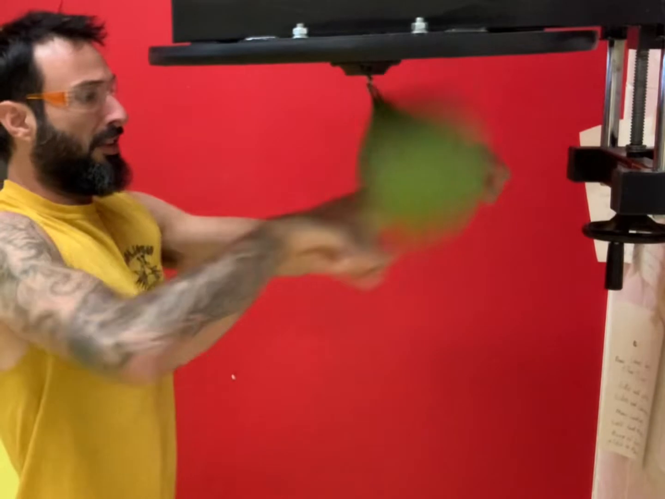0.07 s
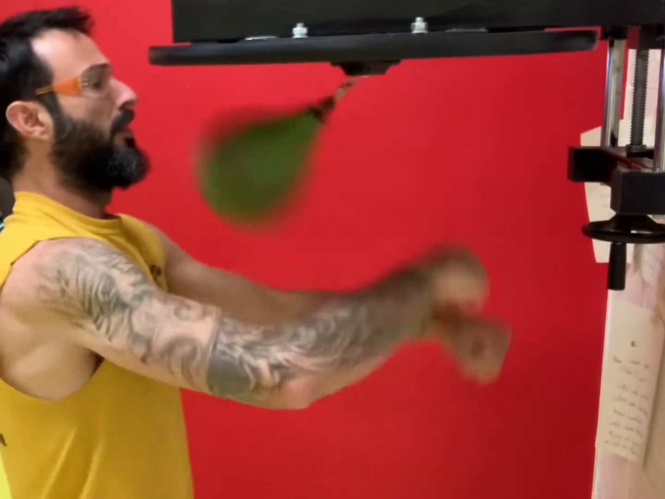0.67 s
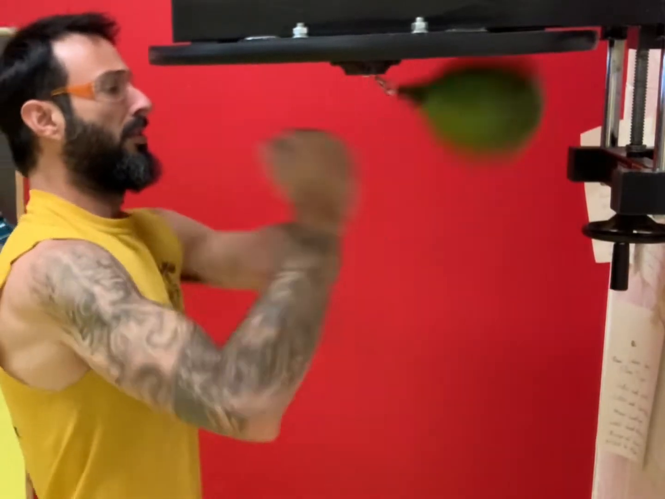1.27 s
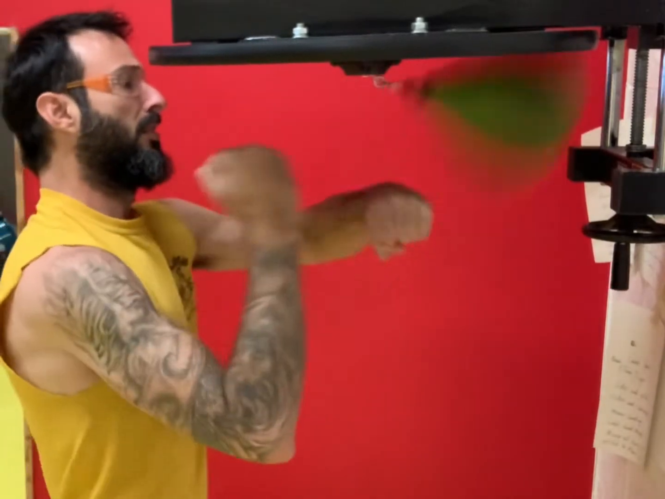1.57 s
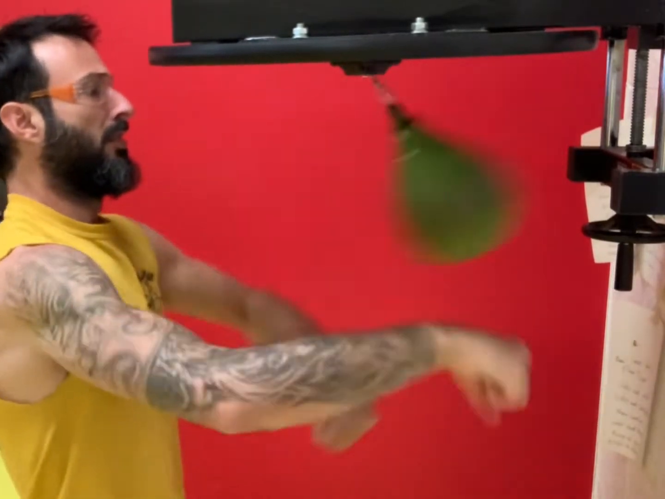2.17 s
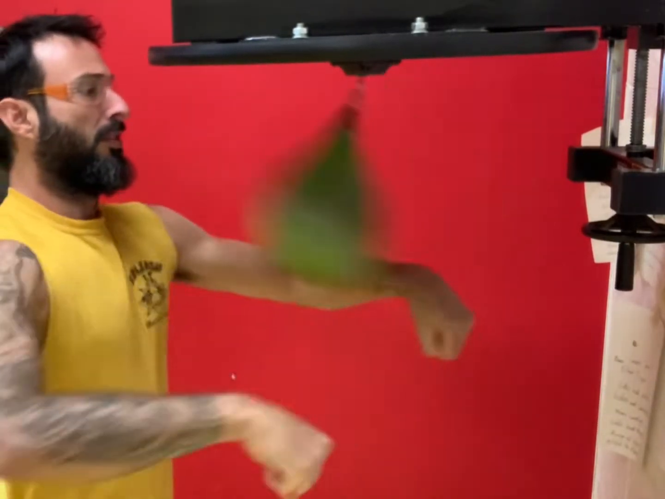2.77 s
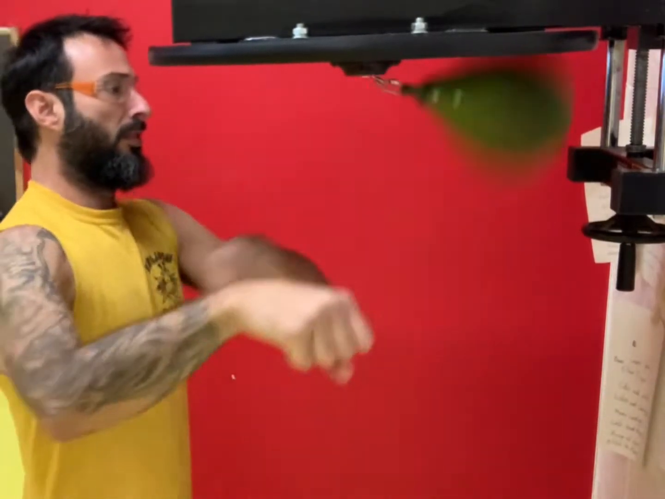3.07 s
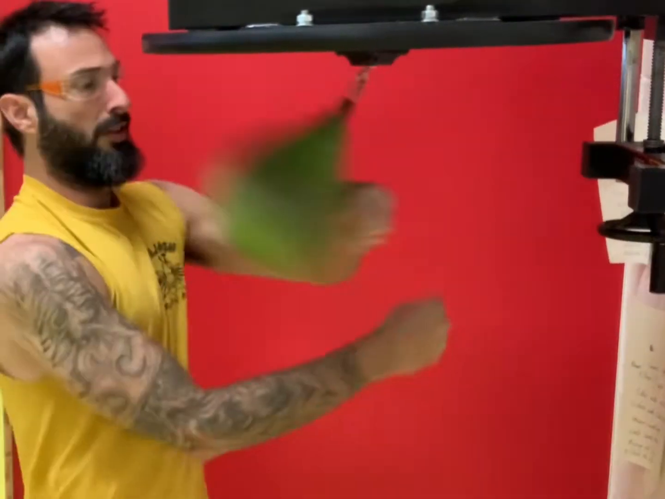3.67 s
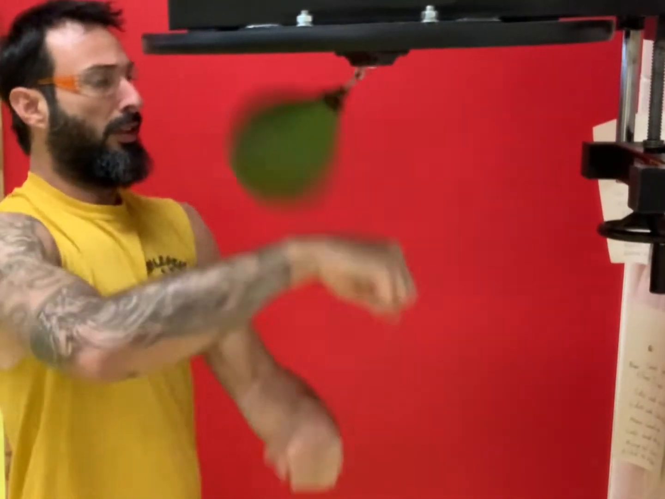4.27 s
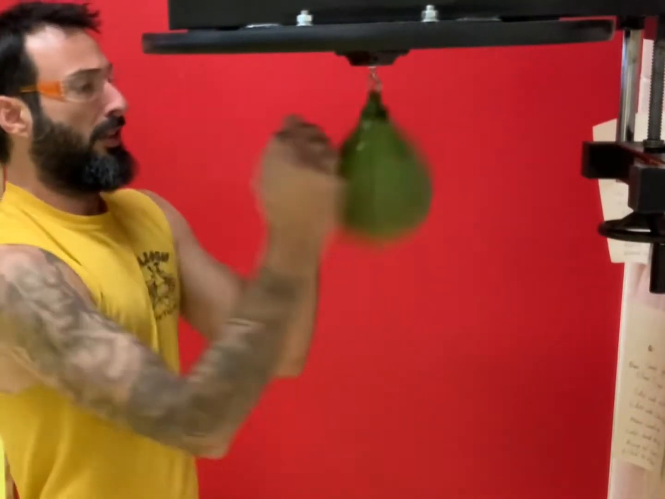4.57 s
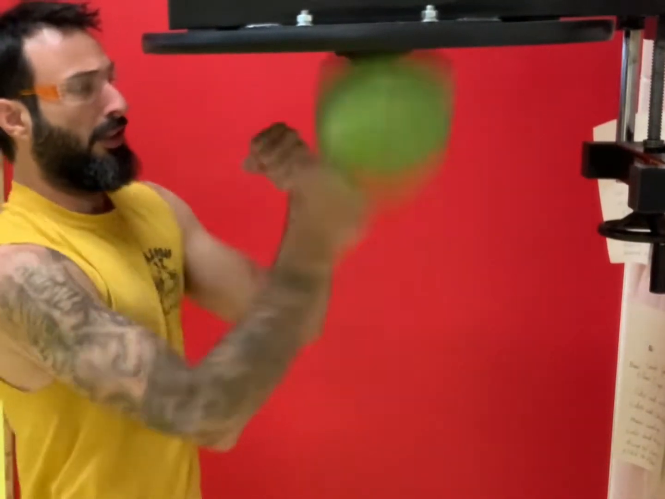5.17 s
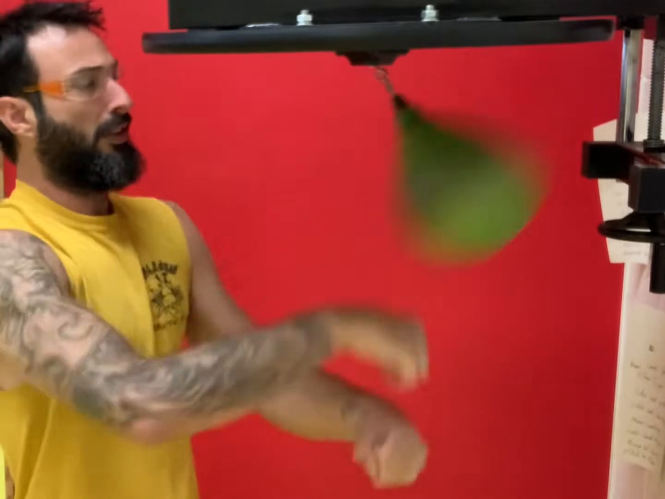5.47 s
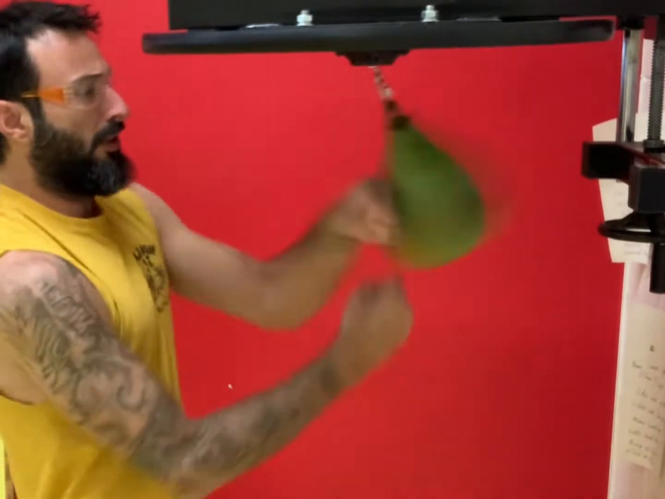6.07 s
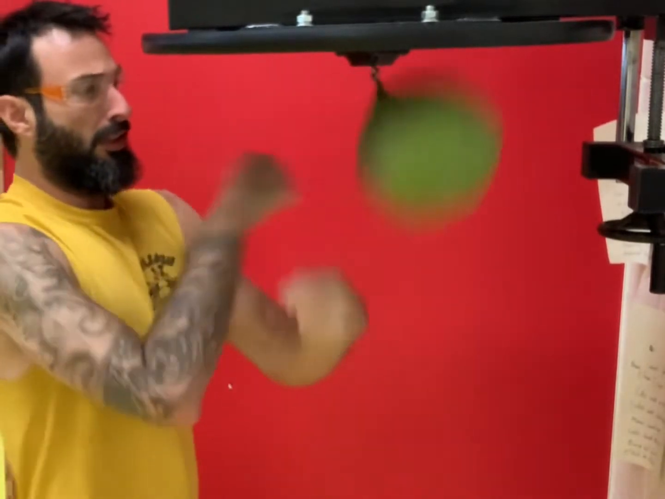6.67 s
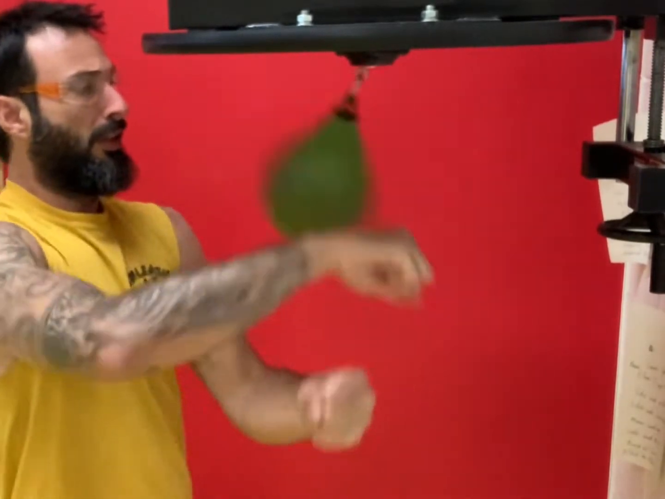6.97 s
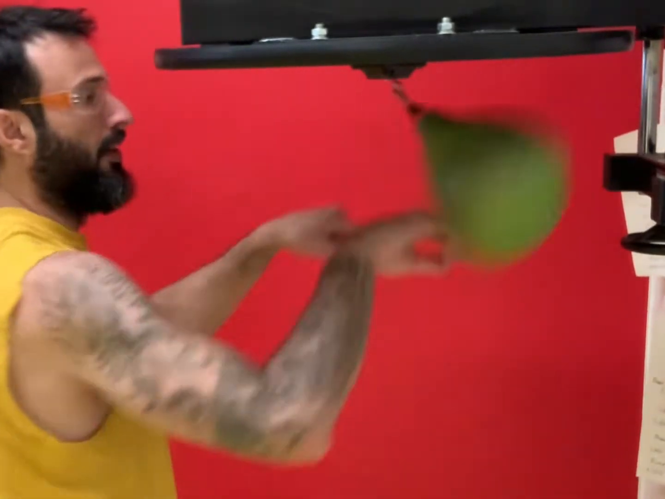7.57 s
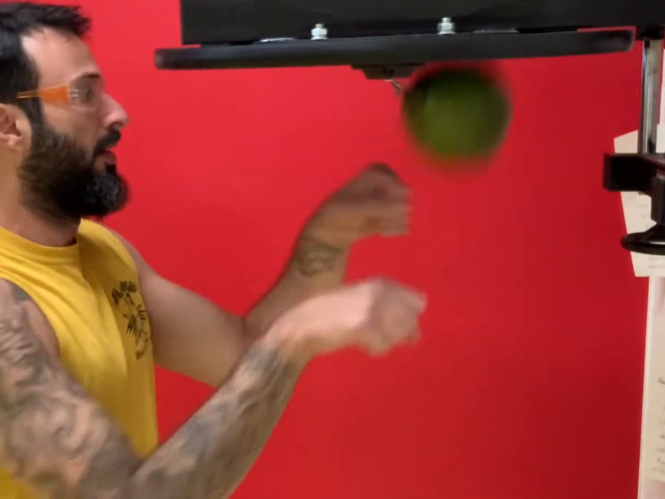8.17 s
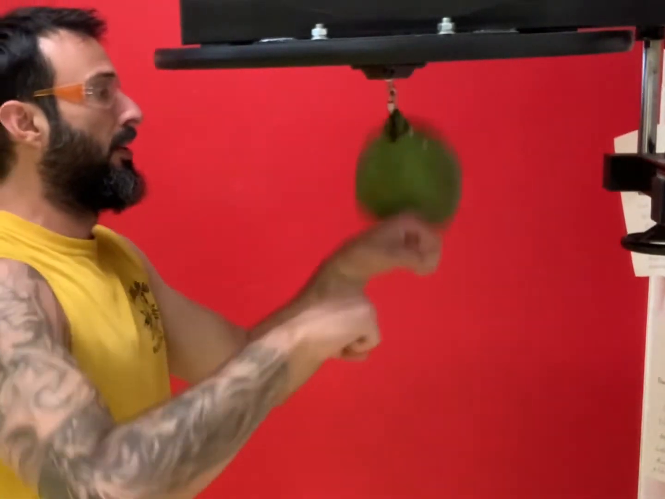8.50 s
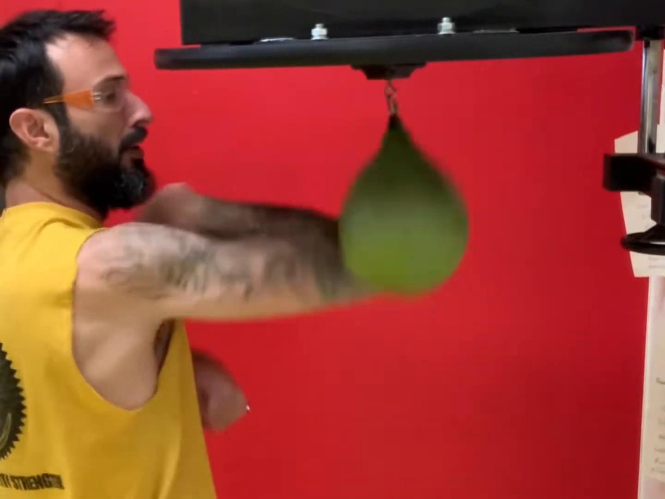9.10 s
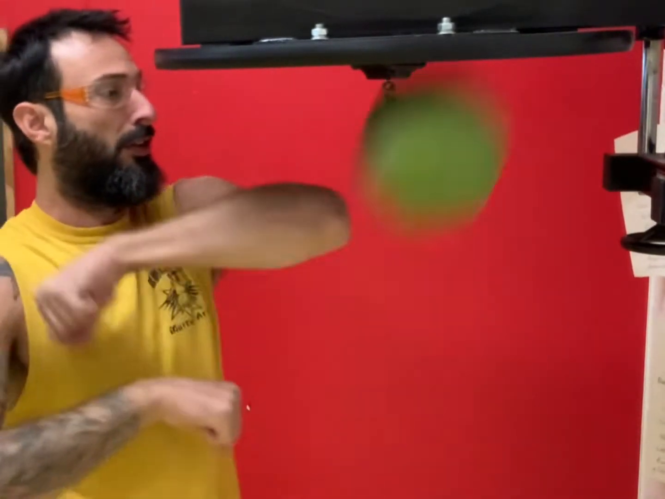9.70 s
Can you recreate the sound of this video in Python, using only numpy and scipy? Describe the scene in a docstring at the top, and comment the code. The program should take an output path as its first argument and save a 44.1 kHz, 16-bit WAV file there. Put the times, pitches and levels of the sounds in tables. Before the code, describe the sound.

A speed bag is punched hard and fast in a small room. Each leather slap is followed by a clack of the steel swivel and a boom from the wooden platform. One blow leaves the bag ringing briefly. About three quarters through, the hard round cuts off and a lighter, slower one takes over with a low hum behind it. A phone microphone picks it all up over a steady low rumble.

```python
"""A boxer opens with a hard round on a speed bag, under a wooden platform in a small, rumbling room. Each slap
of fist or board cracks the leather and rings the air in the bladder; a moment later the steel swivel clacks,
then the platform booms and slams, and the bag swings back and tugs the swivel again. Near 4.5 s one square blow
leaves the bladder singing. At 7.4 s the scene changes abruptly: a lighter, slower round follows with a low hum
behind it. A phone's two microphone ports hear it all."""
import sys
import numpy as np
from scipy import signal
from scipy.fft import rfft, irfft
from scipy.io import wavfile

SR = 44100
rng = np.random.default_rng(int(sys.argv[2]) if len(sys.argv) > 2 else 0)


def dump(signal):
    """Clip the signal to [-1, 1] and save it as 16-bit WAV at the path in sys.argv[1]."""
    limited = np.clip(np.atleast_2d(signal).T, -1, 1)
    pcm = np.round(limited * 32767).astype(np.int16)
    wavfile.write(sys.argv[1], SR, pcm)


N = 438354

# Tone of the room's rumble: freq_hz, level_db
RUMBLE_EQ = [(25, 0), (50, -8), (80, -2), (125, -4.5), (200, -11.5), (300, -10.5), (500, -15),
             (1000, -17.5), (2000, -29.5), (4000, -35), (8000, -48.5), (15000, -57)]
# Reverb time of the room: freq_hz, t60_s
ROOM_DECAY = [(80, 0.79), (200, 0.097), (450, 0.27), (1100, 0.18), (3000, 0.27), (7000, 0.23),
              (14000, 0.11)]
# Left microphone port against the right: freq_hz, gain_db
LEFT_PORT_EQ = [(60, -24.5), (110, -23.0), (200, -17.0), (380, -6.0), (700, -4.0), (1290, -4.0),
                (2380, -2.0), (4400, -0.5), (8120, 1), (15000, 0.0)]
# Phase shift of the left port: freq_hz, phase_rad
LEFT_PORT_PHASE = [(90, 0), (200, -1.8), (550, -3.9), (1000, -5), (1650, -6.9), (2200, -9.4), (3000, -9.2),
                   (3600, -12.4), (6200, -11.4), (7300, -9.8), (10400, -8.9), (12500, -6.5), (16000, -6)]
# How alike diffuse sound is at the two ports: freq_hz, coherence (0 to 1)
PORT_COHERENCE = [(60, 1), (400, 0.96), (800, 0.81), (1400, 0.11), (5000, 0.02), (6500, 0.56), (8500, 1),
                  (15000, 0.96)]

# Boom of the platform and its frame: pitch_hz, level_db, t60_s
BOARD_MODES = [(74.6, -9.5, 0.22), (82.5, -3.5, 0.4), (95.9, 1.5, 0.2), (115.5, -7.5, 0.38),
               (125, -3.5, 0.26), (141.3, -9, 0.25), (165, -2, 0.092), (228, -12.5, 0.26),
               (298, -57, 0.061), (336.5, -11.5, 0.15), (398, -13.5, 0.18)]
# Slam of the board against the frame: pitch_hz, level_db, t60_s
SLAM_MODES = [(76, -16, 0.056), (134.5, 1, 0.078), (224, -4, 0.077), (335, -12.5, 0.051)]
# Hollow thwack of the bag on the wood: pitch_hz, level_db, t60_s
THWACK_MODES = [(291, -0.5, 0.087), (385, -3.5, .08), (514, 0, 0.057), (688, -4, 0.064), (790, -4, 0.052),
                (877, 1, 0.064), (1018, -10, 0.053), (1247, -2, 0.077)]
# Knock of the wood that holds the swivel: freq_hz, level_db
KNOCK_EQ = [(100, -25), (180, -14.5), (235, 3), (320, 6), (430, -6.5), (600, -1.5), (860, -6.5),
            (1400, -18.5), (3000, -24), (10000, -33)]
# Bright tick of the swivel's steel: freq_hz, level_db
TICK_EQ = [(1000, 13), (4000, -25.5), (7000, 5.5), (10000, 4.5), (13000, 2.5), (16000, -8)]
# Clank of its links: freq_hz, level_db
CLANK_EQ = [(500, -16.5), (1000, 13.5), (1600, -2), (2700, 5), (3800, 0), (5000, 1), (6500, -3.5),
            (9000, -6.5), (16000, -44)]
# Chink of the link in its socket: pitch_ratio, level_db, t60_s
CHINK_MODES = [(.55, 0.5, 0.0048), (.78, -0.5, 0.0056), (0.999, 3.5, 0.0079)]
# The bladder singing after a square blow: pitch_hz, level_db, t60_s
SINGING_MODES = [(1000, -3, 0.56), (1660, 0, 0.078), (1796, 1, 0.068)]
# Short ring of the air in the bladder: pitch_ratio, level_db, t60_s
BLADDER_MODES = [(.72, -11, 0.037), (.87, -11, 0.011), (1.024, 5.5, 0.032), (1.17, -3, 0.019),
                 (1.4, 1, 0.0073), (1.7, -2, 0.0058)]
# Crack of the leather skin: freq_hz, level_db
LEATHER_EQ = [(200, -19.5), (450, -2.5), (700, 0), (1200, 2), (2000, -7.5), (3000, -8), (5000, -20),
              (8000, -29.5), (16000, -43)]

# Hard jerks on the swivel between blows: start_s, pull_db, tick_boost_db
JERK_CUES = [(0.334, -41, 8), (0.447, -25.5, -1), (0.699, -34, 0), (0.812, -26.5, -5), (0.928, -29.5, -3),
             (1.168, -51, 16), (1.306, -41.5, 8), (1.423, -34.5, -11), (1.527, -36, 3), (1.631, -41, 7),
             (1.75, -28, -8), (1.95, -33, 5), (2.058, -24.5, -1), (2.323, -29.5, -1), (2.534, -29, 0),
             (2.884, -34, -1), (3.067, -31.5, -7), (3.258, -28, -7), (3.764, -30, -3), (3.8937, -27, -8),
             (4.223, -28.5, -11), (4.309, -40.5, 6), (4.586, -32.5, 6), (4.976, -27.5, 0.5),
             (5.097, -30, -8), (5.2493, -26.5, -10), (5.803, -24.5, -5), (5.848, -22.5, -3),
             (5.931, -43, 10), (6.453, -24.5, -4), (7.133, -32, -7), (7.25, -44, 14), (7.3709, -38, 5),
             (7.511, -40, 6), (7.724, -36.5, -6), (8.48, -31, -9), (8.943, -29, -5)]
# The bag is struck or rebounds (each layer adds its own trim): start_s, slap_db, bladder_hz, sting_db,
# snap_delay_s, pull_db, clank_db, thwack_db, boom_db, chink_hz, slam_db
BLOW_CUES = [(0.028, -19.5, 930, 0, 0.0091, -18, -23, -15, -6, 4480, -8.5),
             (0.134, -13, 876, 7.5, 0.0099, -21.5, -31, -29, -2.5, 5000.0, -8),
             (0.263, -30, 840.0, 4, 0.0027, -24.5, -25.0, -22, -5.5, 4400, -18),
             (0.376, -21.5, 790.0, -4, 0.0067, -20.5, -23, -20.0, -4.5, 4600.0, -15.5),
             (0.484, -18.5, 880, 7.0, 0.017, -22.0, -24.5, -19, -5, 5170, -9.5),
             (0.61, -24, 1310, 0, 0.017, -30, -31, -22, -8, 3730, -21),
             (0.746, -22.0, 1290.0, -3, 0.018, -25, -35, -24, -11.0, 4700.0, -23),
             (0.857, -19.5, 755.0, 13, 0.00021, -25, -22.5, -22, -4, 3200.0, -24),
             (0.964, -19, 1260, 17, 0.0092, -18.5, -21, -20, -3.5, 3440, -17),
             (1.087, -26.5, 900.0, 12, 0.018, -23, -26.5, -27, -11.5, 4350, -18),
             (1.23, -28.5, 820.0, 6.0, 0.017, -33, -37, -44, -9, 2900.0, -31),
             (1.357, -16.0, 1194.0, 1.5, 0.00039, -43, -34.5, -42, -10.5, 4700.0, -24),
             (1.47, -20.5, 870.0, 8, 0.0067, -26, -33, -23.5, -8.5, 4860, -26),
             (1.564, -21.5, 840, -2.0, 0.0067, -23.5, -37, -29.0, -5.5, 5070, -11),
             (1.672, -19.5, 870, 2, 0.012, -20, -25, -22.0, -7.5, 4550, -23),
             (1.794, -17, 840, 13, 0.00066, -20.0, -23.5, -18, -1, 2680, -14),
             (1.903, -24.0, 1240, -3.0, 0.0044, -22.5, -24.5, -26, -5.0, 4170, -27),
             (1.981, -13, 810.0, -2.5, 0.0035, -24.5, -28.5, -23, -0.5, 4700.0, -13),
             (2.096, -20, 920, -2, 0.012, -25.5, -29.5, -21, -7.0, 5000.0, -14),
             (2.243, -26.0, 810, 4, 0.0028, -28, -30.5, -30, -12, 3200.0, -33),
             (2.353, -22, 736.0, 6, 0.0025, -21, -25.5, -18.5, -0.5, 4900.0, -15.5),
             (2.463, -22.5, 1230, 8, 0.011, -22.5, -26.5, -21, -9.0, 5200, -18),
             (2.566, -20, 854, 1.0, 0.012, -24, -23, -21, -0.5, 4830, -7),
             (2.675, -15.5, 870, -7, 0.0028, -25.5, -31, -15.5, -1.5, 3630, -20),
             (2.799, -29, 790, 3, 0.0027, -24, -27, -31, -13.5, 3350, -22),
             (2.92, -15.5, 884.0, 5, 0.0064, -19.5, -22, -22.5, -3.5, 4930, -14),
             (3.183, -20, 820, 1, 0.0092, -27.5, -28.5, -23, -3, 4670, -19),
             (3.298, -17, 1000.0, 1.0, 0.015, -20.5, -25.5, -17, -3, 5300.0, -19),
             (3.425, -24.0, 1120, -5, 0.018, -22.5, -25.5, -24, -9.5, 3470, -40),
             (3.6, -19, 890, -12, 0.016, -33, -27.5, -31, -16.5, 4360, -24),
             (3.685, -21, 740, 3, 0.0088, -26, -28.5, -29.0, -7.5, 2970, -28),
             (3.791, -16, 1220, 8, 0.023, -23.5, -26.5, -20, -8.5, 5560, -18),
             (3.935, -15, 960, 6, 0.012, -22.5, -21.0, -19.5, -7.5, 4600, -10.5),
             (4.058, -22, 950.0, -6, 0.016, -20, -23, -20, -5.5, 3480, -16.5),
             (4.373, -27.0, 990.0, -5, 0.019, -36, -33.5, -27, -11.5, 4900, -31),
             (4.462, -14.5, 960, -0.5, 0.038, -32.0, -29.5, -19, -8, 5540, -40),
             (4.634, -20, 1190, 1, 0.0121, -25.0, -26.5, -24, -4, 4970, -28),
             (4.741, -19, 840.0, 6, 0.0056, -20.5, -25, -11, -4, 3500, -16),
             (4.87, -28, 1290.0, 4, 0.0188, -33, -27.5, -34, -7.5, 2670, -32),
             (5.023, -23, 1280.0, 5, 0.0071, -24.5, -28, -24, -6.5, 6100, -16),
             (5.132, -24.5, 970, -3.0, 0.0301, -30.5, -30, -36, -7, 5400.0, -28),
             (5.29, -13, 1140, -8, 0.0085, -22.5, -22, -18, -6.0, 3330, -13),
             (5.41, -17, 1100, -6, 0.0099, -26.0, -22.5, -20, -6.5, 3480, -25),
             (5.575, -25.5, 784.0, 12, 0.003, -31.0, -33, -33.0, -13.5, 3100.0, -28),
             (5.726, -21.0, 1170.0, -1, 0.012, -29, -30.5, -41.0, -4.5, 3300, -39),
             (5.979, -20.5, 890, 1, 0.0168, -24, -22.0, -19, -3.5, 4830, -26),
             (6.087, -16, 890, -5, 0.007, -20.5, -22.0, -15, -0.5, 3360, -17),
             (6.205, -29, 1480, 14.0, 0.0091, -20, -25, -38, -12, 3860, -17),
             (6.369, -21.5, 990, 5, 0.014, -22, -27, -31, -8.5, 6100, -29),
             (6.498, -25.5, 785.0, 10, 0.0035, -23.5, -25, -37, -7.5, 6200, -27),
             (6.625, -16, 1230, -1, 0.013, -21.5, -23.5, -24, -7.5, 3560, -15),
             (6.754, -13.0, 1040, -13, 0.0078, -24.5, -25.5, -38, -5.5, 5150, -11.5),
             (6.899, -24, 860, -4, 0.0022, -27, -29.0, -38, -8.5, 5470, -28),
             (7.06, -29, 1250, -9, 0.009, -35, -37.5, -44, -7.5, 5400, -39),
             (7.146, -19, 1160, 2, 0.029, -32, -33, -22.0, -5, 5600.0, -24),
             (7.298, -23.5, 990.0, 12, 0.016, -22, -27, -18.5, -3.5, 3430, -22),
             (7.407, -14.5, 1260, -11, 0.0083, -22.5, -25, -23, 2, 3700, -34),
             (7.586, -29.5, 1180, -9, 0.018, -31.0, -35, -41, -21, 5430, -34),
             (7.778, -19.5, 1168.0, -1, 0.021, -32, -28.5, -26.5, -15, 5800, -29),
             (7.984, -30.5, 1200, -1.0, 0.019, -39, -37, -37, -17, 5300, -33.0),
             (8.172, -24.0, 1190, -1, 0.005, -33, -33.5, -26, -13.5, 3300.0, -34),
             (8.367, -23.5, 890.0, -0.5, 0.016, -46, -45.0, -39, -23.0, 5000.0, -39),
             (8.554, -26.5, 850.0, -3, 0.0016, -42, -43.0, -31, -28, 2760, -45),
             (8.738, -26, 1010, -9, 0.019, -38, -31, -25.0, -14.0, 5850, -26),
             (8.856, -31, 870, -7, 0.0032, -36, -45.0, -47, -13, 5000.0, -38),
             (9.139, -22, 1230, -5.5, 0.02, -33, -37.0, -38, -18, 3500.0, -36),
             (9.318, -25.5, 1160, 2, 0.019, -29, -33.5, -38, -16.5, 5030, -40),
             (9.51, -27.0, 1210, -8, 0.019, -34, -31.5, -38.0, -15.5, 5150, -35.0),
             (9.691, -32, 1160, -10, 0.026, -30.5, -32.5, -26, -14.5, 4800, -32.0),
             (9.899, -30.5, 1330, 1.0, 0.024, -43, -39, -27, -30, 5140, -41.0)]

BREAK_S = 7.429  # the scene changes from the hard round to the light one
BOOM_LAG_S = 0.01108  # the bag's weight follows the pull into the board
FIRM_PULL_DB, FIRM_SLAP_DB, FIRM_BOOM_DB = -22, -20, -6  # a firm blow, the reference for all others


def undb(db):
    """Decibels to gain."""
    return 10 ** (np.asarray(db) / 20)


def at(points, hz):
    """Read a curve of (freq_hz, value) points on a log-frequency axis."""
    f, value = np.transpose(points)
    return np.interp(np.log(hz + 1), np.log(f + 1), value)


def seconds(length_s):
    """Time axis of the given length."""
    return np.arange(int(length_s * SR)) / SR


def unit(x):
    """Scale to the energy of 10 ms at rms 1."""
    return x * np.sqrt(.01 * SR / np.sum(x ** 2))


def add(track, start_s, x):
    """Mix x into the track at its cue."""
    i = max(int(start_s * SR), 0)
    track[i:i + len(x)] += x[:max(N - i, 0)]


def body_response(eq, size=1024):
    """Minimum-phase impulse response of an EQ curve: tone without pre-ring."""
    cepstrum = irfft(np.log(undb(at(eq, np.fft.rfftfreq(size, 1 / SR)))))
    cepstrum[1:size // 2] *= 2
    cepstrum[size // 2 + 1:] = 0
    return irfft(np.exp(rfft(cepstrum)))


def burst(body, t60_s, rise_s, snap=0):
    """A rough contact builds and dies, heard through a body; snap adds one clean transient."""
    t = seconds(.08)
    grit = unit(rng.standard_normal(len(t)) * (1 - np.exp(-t / rise_s)) * undb(-60 * t / t60_s))
    click = unit(signal.unit_impulse(len(t), int(rise_s * SR)))
    return unit(signal.fftconvolve(grit + snap * click, body))


def ring(hz, db, t60_s, detune, scatter_db):
    """Damped modes; each blow lands elsewhere and shifts their tuning and balance."""
    t = seconds(min(1.2 * max(t60_s), 1))
    tuning, balance = rng.standard_normal((2, len(hz)))
    waves = np.sin(2 * np.pi * np.outer(t, hz * (1 + detune * tuning)))
    decays = undb(-60 * t[:, None] / t60_s)
    return (waves * decays) @ undb(db + scatter_db * balance)


def port_noise(n):
    """Spectra of diffuse noise at the two ports, as alike as their spacing allows."""
    shared, apart = rfft(rng.standard_normal((2, n)))
    coherence = np.clip(at(PORT_COHERENCE, np.fft.rfftfreq(n, 1 / SR)), 0, 1)
    return np.array([coherence * shared + np.sqrt(1 - coherence ** 2) * apart, shared])


def room(x, wet_db, build_s):
    """The direct sound plus a diffuse tail at each port; the deep bass hangs on longest."""
    t = seconds(.4)
    f = np.fft.rfftfreq(len(t), 1 / SR)
    noise, tails = port_noise(len(t)), 0
    for band_hz, t60_s in ROOM_DECAY:
        band = at([(hz, hz == band_hz) for hz, _ in ROOM_DECAY], f)
        tails = tails + irfft(noise * band, len(t)) * undb(-60 * t / t60_s)
    tails = tails * (1 - np.exp(-t / build_s))
    response = undb(wet_db) * tails / np.sqrt(np.sum(tails ** 2, axis=1, keepdims=True))
    response[:, 0] += 1  # direct sound
    return signal.fftconvolve(x[None], response, axes=1)[:, :N]


def rumble(level_db, waver_db):
    """Room tone: a bed of low noise whose level wavers a little."""
    noise = irfft(port_noise(N) * undb(at(RUMBLE_EQ, np.fft.rfftfreq(N, 1 / SR))), N)
    waver = np.interp(np.arange(N), np.linspace(0, N, 60), rng.standard_normal(60))
    return noise / noise.std() * undb(level_db + waver_db * waver)


def hum(pitch_hz, width_hz, level_db):
    """A low, wavering hum: noise in one narrow resonance."""
    f = np.fft.rfftfreq(N, 1 / SR)
    drone = irfft(port_noise(N) / (1 + ((f - pitch_hz) / width_hz) ** 2), N)
    return drone / drone.std() * undb(level_db)


def platform(cues):
    """The bag presses into the board and a boom swells; a harder blow feeds the higher modes."""
    track = np.zeros(N)
    hz, db, t60_s = np.transpose(BOARD_MODES)
    octaves = np.clip(np.log2(hz / 85), -.3, .6)
    for start_s, level_db, tilt_db_per_oct in cues:
        boom = ring(hz, db + tilt_db_per_oct * octaves, t60_s, detune=0.0029 / t60_s, scatter_db=3)
        swell = 1 - np.exp(-np.arange(len(boom)) / SR / 0.0076)
        add(track, start_s, undb(level_db - 1) * unit(boom * swell))
    return room(track, wet_db=-18, build_s=0.0027)


def slams(cues, bounce_s=0.01453):
    """A heavy rebound lifts the board against its frame; it drops back and strikes again."""
    track = np.zeros(N)
    for start_s, level_db in cues:
        for lag_s in (0, bounce_s):
            slam = unit(ring(*np.transpose(SLAM_MODES), detune=0.025, scatter_db=1))
            add(track, start_s + BOOM_LAG_S + lag_s, undb(level_db) * slam)
    return room(track, wet_db=-18, build_s=0.0027)


def thwacks(cues):
    """The bag flattens against the wood, and both ring with a hollow body."""
    track = np.zeros(N)
    for start_s, level_db in cues:
        thwack = unit(ring(*np.transpose(THWACK_MODES), detune=0.023, scatter_db=2))
        add(track, start_s, undb(level_db - 1.5) * thwack)
    return room(track, wet_db=3.5, build_s=0.0023)


def chinks(cues):
    """The link strikes its socket: a short ring whose pitch depends on how it lands."""
    track = np.zeros(N)
    ratio, db, t60_s = np.transpose(CHINK_MODES)
    for start_s, level_db, pitch_hz in cues:
        chink = unit(ring(ratio * pitch_hz, db, t60_s, detune=0.012, scatter_db=6))
        add(track, start_s, undb(level_db - 3.5) * chink)
    return room(track, wet_db=-3, build_s=.003)


def swivel(pulls, clanks_db, touches=18, fade_db_per_s=50):
    """The steel link snaps taut, bounces in its socket, jingles on and knocks the wood that holds it."""
    steel, wood = np.zeros((4, N)), np.zeros(N)  # four spots for the steel, each with its own reflections
    tick, clank, knock = map(body_response, (TICK_EQ, CLANK_EQ, KNOCK_EQ))
    chances = rng.random((len(pulls), 2 + touches))
    for (start_s, pull_db, boom_db, tick_boost_db, _), clank_db, chance in zip(pulls, clanks_db, chances):
        spot = steel[rng.integers(len(steel))]
        tick_db = pull_db + tick_boost_db
        bounce_s, bounce_db = 0.0025 + 0.0044 * chance[0], -13 + 6 * chance[1]
        for lag_s, drop_db in ((0, 0), (bounce_s, bounce_db)):
            point = undb(tick_db - 2.8) * burst(tick, t60_s=.008, rise_s=.0006, snap=1.15)
            links = undb(clank_db + 1) * burst(clank, t60_s=0.0078, rise_s=0.00033, snap=0.43)
            add(spot, start_s + lag_s, undb(drop_db) * (point + links))
        for lag_s in .008 + .13 * chance[2:]:  # loose links keep touching, ever more lightly
            touch = undb(tick_db - 27.3) * burst(tick, t60_s=0.012, rise_s=0.00035, snap=0.96)
            touch[:len(clank)] += undb(clank_db - 16.5) * unit(clank)
            add(spot, start_s + lag_s, undb(-fade_db_per_s * lag_s) * touch)
        knock_db = -18 + 0.27 * (pull_db - FIRM_PULL_DB) + 0.65 * (boom_db - FIRM_BOOM_DB)
        add(wood, start_s + 0.000953, undb(knock_db) * burst(knock, t60_s=0.048, rise_s=0.0023))
    bright = sum(room(spot, wet_db=1.5, build_s=0.00043) for spot in steel)
    return bright + room(wood, wet_db=1, build_s=0.016)


def backswings(hits, longest_swing_s=.225, tick_boost_db=-20, tilt_db_per_oct=-8.5):
    """The bag swings back with a light tug just past mid-swing, in gaps that hold no hard jerk."""
    tugs = []
    for before, after, (timing, force) in zip(hits, hits[1:], rng.standard_normal((len(hits), 2))):
        if any(before[0] < jerk_s < after[0] for jerk_s, _, _ in JERK_CUES):
            continue
        gap_s = after[0] - before[0]
        swings = int(np.ceil(gap_s / longest_swing_s))
        pull_db, boom_db = (before + after)[1:3] / 2
        times = before[0] + gap_s * (np.arange(swings) + .57 + 0.027 * timing) / swings
        tugs += [(s, pull_db - 22 + force, boom_db - 6, tick_boost_db, tilt_db_per_oct) for s in times]
    return tugs


def jerks(hits, start_s, end_s, tilt_db_per_oct=-19.5):
    """A hard jerk on the swivel also thumps the board, dully and just under the booms around it."""
    return [(s, pull_db, np.interp(s, hits[:, 0], hits[:, 2]) - 2.5, tick_boost_db, tilt_db_per_oct)
            for s, pull_db, tick_boost_db in JERK_CUES if start_s <= s < end_s]


def rebounds(blows, tilt_db_per_oct):
    """After each slap the bag pulls the swivel taut and thumps the board, brighter with more force."""
    start_s, slap_db, _, _, snap_delay_s, pull_db, _, _, boom_db, _, _ = blows.T
    tilt = tilt_db_per_oct + (pull_db - FIRM_PULL_DB) + 0.39 * (slap_db - FIRM_SLAP_DB)
    return np.transpose([start_s + snap_delay_s, pull_db, boom_db, np.zeros(len(blows)), tilt])


def singing_bag(start_s, level_db):
    """One square blow leaves the bladder singing."""
    track = np.zeros(N)
    tone = unit(ring(*np.transpose(SINGING_MODES), detune=0.0017, scatter_db=-2))
    add(track, start_s, undb(level_db) * tone)
    return room(track, wet_db=4, build_s=.003)


def leather(cues):
    """Each slap cracks the skin, dully or with a sting, and rings the air inside the bag."""
    stereo = np.zeros((2, N))
    ratio, db, t60_s = np.transpose(BLADDER_MODES)
    for start_s, level_db, pitch_hz, sting_db in cues:
        skin_eq = [(hz, eq_db + sting_db * np.clip(np.log2(hz / 1000), 0, 1)) for hz, eq_db in LEATHER_EQ]
        air = unit(ring(ratio * pitch_hz, db, t60_s, detune=0.028, scatter_db=2))
        slap = undb(level_db - 5) * burst(body_response(skin_eq), t60_s=0.02, rise_s=0.00055)
        slap[:len(air)] += undb(level_db - 5.5) * air[:len(slap)]
        for port, heard in zip(stereo, room(slap, wet_db=4.5, build_s=0.0021)):  # its own reflections
            add(port, start_s, heard)
    return stereo


def bag_round(start_s, end_s, tilt_db_per_oct=0):
    """One round: blows, jerks and tugs play steel, wood and leather; negative tilt dulls the booms."""
    blows = np.array([row for row in BLOW_CUES if start_s <= row[0] < end_s])
    clank_db, thwack_db, _, chink_hz, slam_db = blows[:, 6:].T
    # Hits and swings both pull on the swivel: start_s, pull_db, boom_db, tick_boost_db, tilt_db_per_oct
    hits = rebounds(blows, tilt_db_per_oct)
    swings = jerks(hits, start_s, end_s) + backswings(hits)
    pulls, hit_s = [*hits, *swings], hits[:, 0]
    swing_clanks_db = [-25.5 + 1.25 * (pull_db - FIRM_PULL_DB) for _, pull_db, *_ in swings]
    swing_thwacks = [(s, pull_db - 0.5) for s, pull_db, *_ in swings]
    booms = [(s + BOOM_LAG_S, boom_db, tilt) for s, _, boom_db, _, tilt in pulls]
    steel = swivel(pulls, [*clank_db, *swing_clanks_db]) + chinks(zip(hit_s, clank_db, chink_hz))
    wood = thwacks([*zip(hit_s, thwack_db), *swing_thwacks])
    wood += platform(booms) + slams(zip(hit_s, slam_db))
    return leather(blows[:, :4]) + steel + wood


def ports(stereo):
    """The left port is shifted in phase against the right one and thin in the bass."""
    f = np.fft.rfftfreq(N, 1 / SR)
    left, right = stereo
    phase_rad = np.interp(f, *np.transpose(LEFT_PORT_PHASE))
    colour = undb(at(LEFT_PORT_EQ, f)) * np.exp(1j * phase_rad)
    return np.array([irfft(rfft(left) * colour, N), right])


def scene():
    """The scene changes: the hard round is cut off, tails and all, and the light round follows with a hum
    behind it."""
    hard = bag_round(0, BREAK_S) + singing_bag(start_s=4.463, level_db=-19.5)
    hard += rumble(level_db=-24, waver_db=2.5)
    light = bag_round(BREAK_S, N / SR, tilt_db_per_oct=-12)
    light += rumble(level_db=-26, waver_db=1.5) + hum(pitch_hz=163.6, width_hz=9.8, level_db=-33)
    fader = np.clip((BREAK_S - np.arange(N) / SR) / .002, 0, 1)  # 2 ms crossfade
    return ports(fader * hard + (1 - fader) * light)


def record(dry, low_cut_hz=47, high_cut_hz=16250):
    """The phone drops the deepest bass, rounds the loudest peaks and cuts the top."""
    thinned = signal.sosfilt(signal.butter(4, low_cut_hz, "high", fs=SR, output="sos"), dry)
    rounded = np.tanh(.9 * thinned) / .9
    return signal.sosfilt(signal.ellip(8, .2, 80, high_cut_hz, fs=SR, output="sos"), rounded)


dry = scene()
out = record(dry)
dump(out)
```